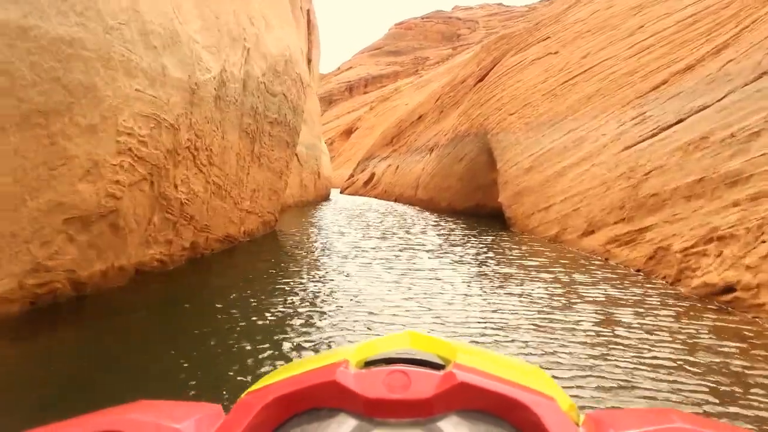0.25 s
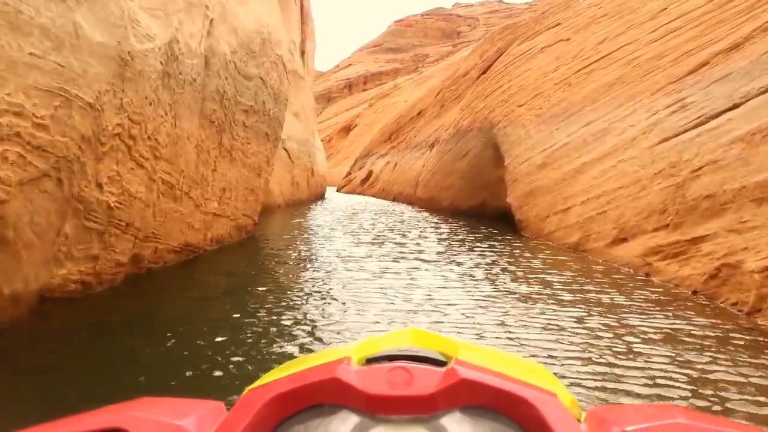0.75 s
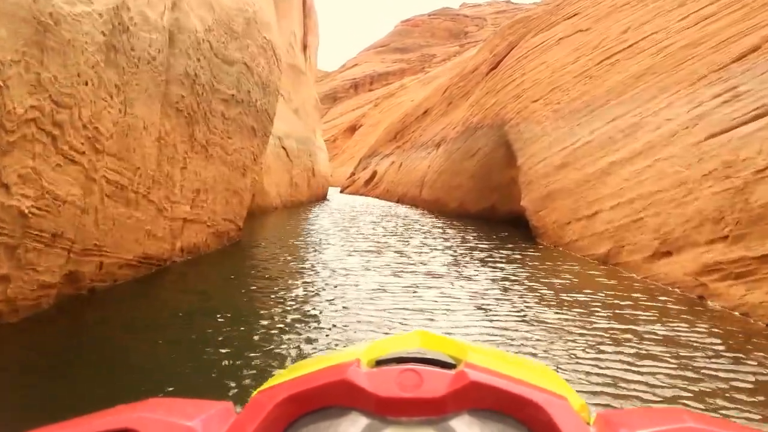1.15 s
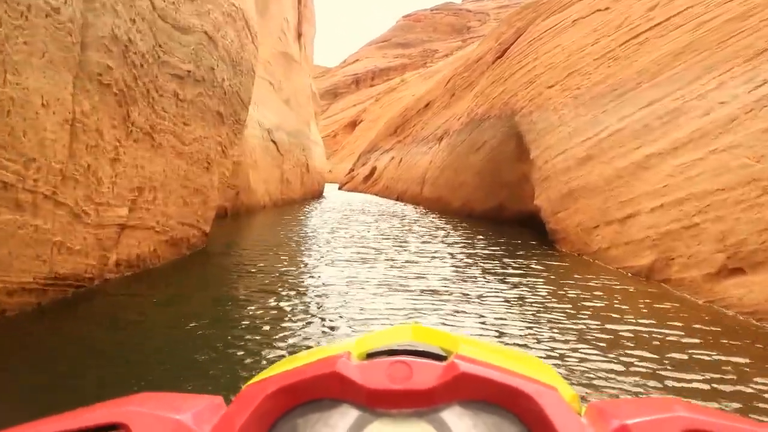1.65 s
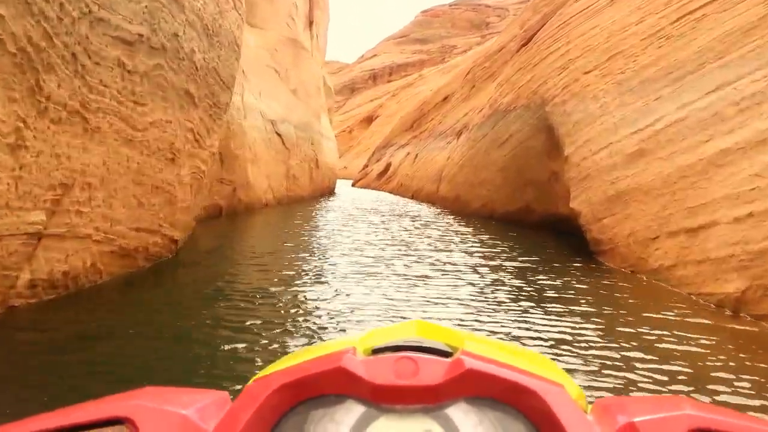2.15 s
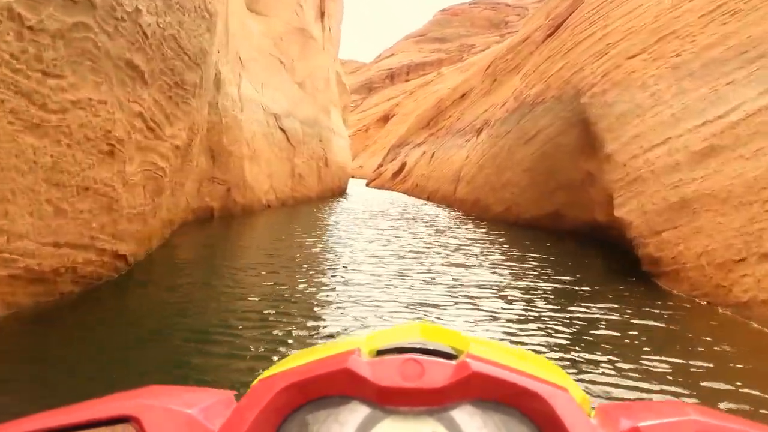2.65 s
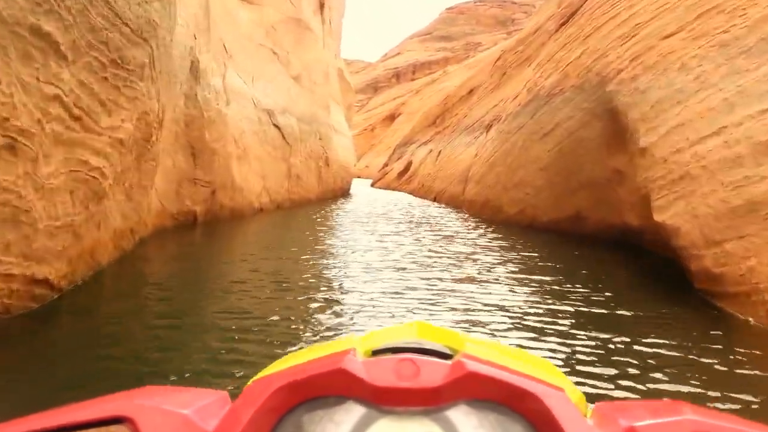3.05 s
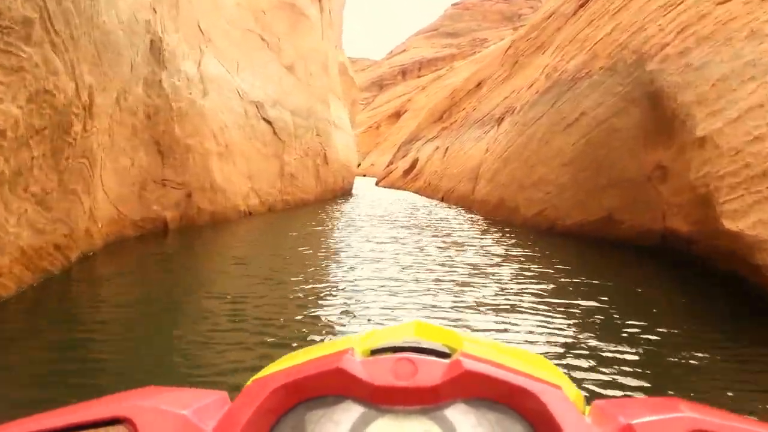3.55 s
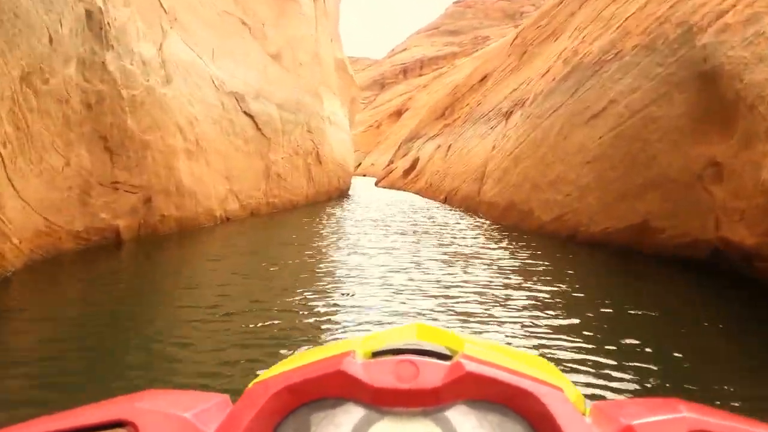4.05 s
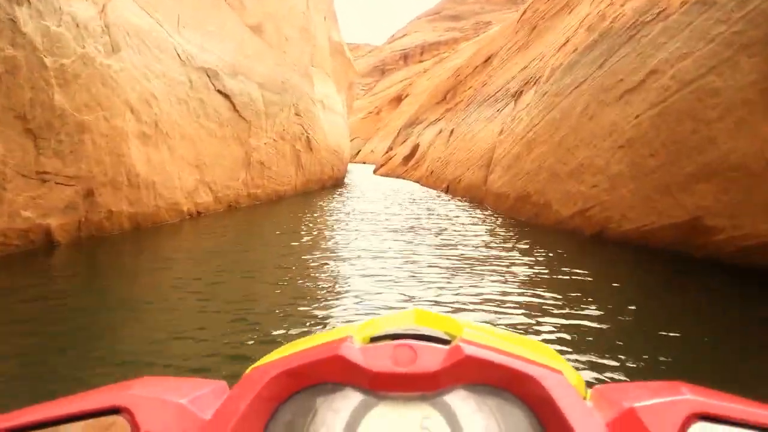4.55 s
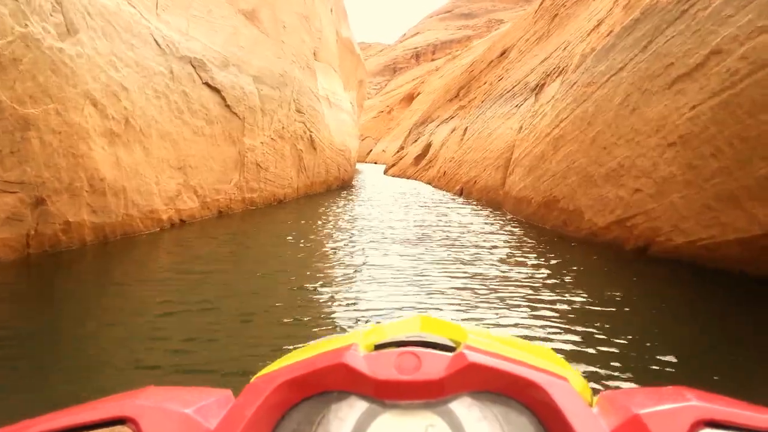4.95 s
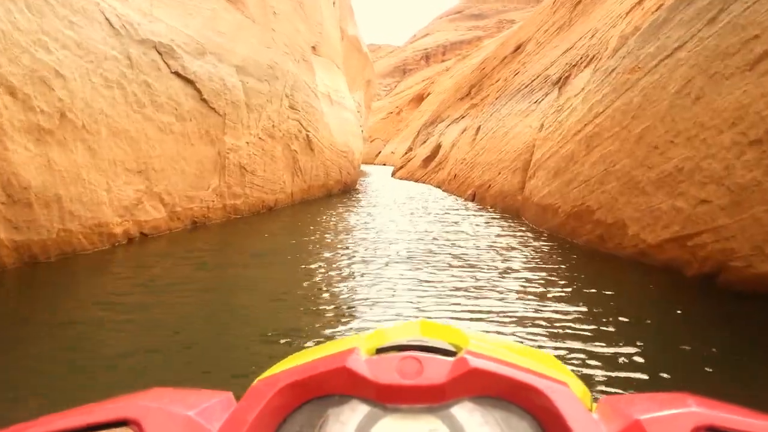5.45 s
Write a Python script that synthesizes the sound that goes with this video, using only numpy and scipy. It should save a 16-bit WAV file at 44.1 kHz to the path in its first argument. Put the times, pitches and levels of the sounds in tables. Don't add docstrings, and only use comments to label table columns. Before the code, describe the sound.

From 0 s, a small watercraft engine is already running at low speed: a thick, buzzing drone centred low, around 230 Hz, with hull boom and rough overtones that waver. A continuous rush of water runs along the hull, swelling and dipping gently, speckled with fine ticking droplets, brighter on the left while the right is muffled. A faint drop taps at 0.3 s; brief stumbles weaken the motor around 1.3 and 1.9 s. At 2.6 s a dull water slap lands on the left. The engine then settles slightly lower, and the hiss on the right thickens a little as rock closes in. Small drops tick at 2.9 and 3.1 s, then a cluster from 3.3 s peaks in one sharp, hard tap at 3.4 s. The motor idles on with dips near 3.8, 4.2 and 4.8 s; light drops fall at 5.1 and 5.6 s, and sound continues to the cut at about 5.7 s.

```python
import sys
import numpy as np
from scipy import signal
from scipy.fft import rfft, irfft, dct, next_fast_len
from scipy.io import wavfile
from scipy.ndimage import uniform_filter1d

SR = 44100
rng = np.random.default_rng(int(sys.argv[2]) if len(sys.argv) > 2 else 0)


def invert_db(level):
    return 10 ** (np.asarray(level, dtype=float) / 20)


def dump(signal):
    limited = np.clip(np.atleast_2d(signal).T, -1, 1)
    pcm = np.round(limited * 32767).astype(np.int16)
    wavfile.write(sys.argv[1], SR, pcm)


N = 250786
SIZE = next_fast_len(N)

# time in seconds, engine cycle rate in Hz, level of its ninth multiple in dB.
ENGINE_SPEED = [(0, 26.25, -11.5), (.22, 26.12, -11), (.4, 26.3, -15.5), (.65, 26.0, -12.5),
                (.85, 26.23, -10.5), (1.15, 26.61, -10.5), (1.45, 26.35, -11), (1.8, 26.4, -12.5),
                (2.25, 26.12, -11), (2.7, 25.45, -12.5), (3.05, 24.84, -12.5), (3.35, 25.12, -14),
                (3.7, 24.97, -11.5), (4.15, 25.35, -11.5), (4.45, 24.35, -10.5), (4.75, 24.35, -11.5),
                (5.1, 24.13, -10.5), (5.69, 24.2, -11.5)]
FIRING_MULTIPLES = (6, 9, 12, 15)
# multiple of the cycle rate, level in dB (firing multiples: relative
# to the ninth's mean; others: relative to -15 dB).
FAST_OVERTONES = [(1, -58), (2, -45), (3, -16.5), (4, -18.5), (5, -20), (6, -10), (7, -31), (8, -14),
                  (9, 0.5), (10, -22), (11, -14.5), (12, -5.5), (13, -20), (14, -16), (15, -16), (16, -31),
                  (17, -20), (18, -18.5), (19, -28), (20, -22.5), (21, -23.5), (22, -23)]
# multiple of the cycle rate, level in dB (firing multiples: relative to
# the ninth's mean; others: relative to -15 dB).
SLOW_OVERTONES = [(1, -60), (2, -40), (3, -29), (4, -27), (5, -15), (6, -21), (7, -39), (8, -10), (9, 0.5),
                  (10, -10), (11, -28), (12, -21.5), (13, -12), (14, -37), (15, -24.5), (16, -34),
                  (17, -27.5), (18, -21), (19, -36), (20, -29), (21, -34.5), (22, -21.5)]
# time in seconds, level change in dB, sag in Hz.
STUMBLES = [(1.29, -5.5, .4), (1.58, -2.5, .4), (1.88, -3.5, 0.048), (2.08, -2, 0.499), (2.93, -3, .2),
            (3.3, -3, 0.047), (3.76, -5, 0.493), (4.21, -2.5, 1.096), (4.8, -6, .5), (5.3, -1.5, 0.31),
            (5.55, -3.5, .3)]
# time in seconds, multiple of the cycle rate, half length in seconds, lift in dB.
WALL_ECHOES = [(0.16, 14, 0.052, 7.5), (0.78, 18, 0.13, 12), (2.2, 5, 0.5, 5), (.6, 4, 0.55, 3.5),
               (1.94, 18, 0.19, 12), (2.3, 18, 0.14, 7), (3.38, 18, 0.29, 8.5), (3.065, 5, 0.51, 6.5),
               (8, 13, 0.13, 5), (5.62, 13, .1, 8), (1.76, 6, 0.36, -15.5), (2.4, 6, 0.82, -5.5),
               (3.84, 6, 0.48, 8.5), (5.55, 6, 0.12, 5.5), (1.75, 12, 0.36, 2), (3.45, 12, 0.22, -6.5),
               (3.3, 12, .1, -9.5), (.05, 15, .12, -12.5), (1.15, 15, .15, -11), (2.65, 15, 0.3, 9),
               (3.3, 15, 0.19, 11), (3.757, 15, .25, 9.5), (0.82, 5, 0.29, -10), (4.9, 14, .1, 10),
               (3.0, 14, .12, 6), (5.2, 12, 0.22, 2), (3.8, 8, .2, 6.5), (4.3, 13, .15, 2),
               (4.75, 8, .4, 4), (4.5, 10, .3, 3)]
# frequency in Hz, phase lag in radians.
PORT_LAG = [(0, .05), (260, .17), (430, .48), (700, .6), (1000, 1.15), (1300, 2.1), (1500, 3.4),
            (2000, 4.95), (2500, 6.4), (4200, 12.1), (16000, 12.5)]
# frequency in Hz, left level in dB per Hz, right level in dB per Hz.
RUSH_SPECTRUM = [(59, -21.5, -21.5), (117, -4, -6.5), (246, 5, 6.5), (417, -1.5, -0.3), (820, -3.5, -5.5),
                 (1030, -6, -10), (1750, -6, -12), (2320, -6, -21.5), (2740, -8.5, -31.5),
                 (4360, -12, -33.5), (6310, -33.5, -35.5), (9020, -32.5, -38.5), (11680, -43, -46),
                 (14300, -65.5, -38.5)]
# frequency in Hz, likeness from 0 to 1.
PORT_LIKENESS = [(40, .98), (290, .99), (430, .92), (600, .77), (800, .72), (1100, .28), (1350, .18),
                 (1750, .3), (2000, .54), (2350, .46), (2800, .17), (4200, .15), (5500, .03)]
# time in seconds, half length in seconds, lift in dB.
SURGES = [(.4, 0.39, 0.6), (.9, .12, -1), (1.24, .04, 2.5), (1.68, 0.047, 2.5), (1.87, 0.044, 2),
          (2.2, 0.025, 1), (2.41, .1, -2.5), (2.6, 0.044, 2), (3.0, 0.13, 1), (3.33, 0.073, 2),
          (4.3, .2, 0.8), (4.75, 0.085, -0.5), (5.6, 0.14, 1.5)]
# time in seconds, peak level in dB, ring frequency in Hz.
DROPS = [(0.2992, -20, 3967), (2.85, -18, 3760), (3.0914, -14, 3297), (3.3094, -24, 3570),
         (3.3204, -22, 4150), (3.3804, -21, 2930), (3.4362, -4.5, 3760), (3.4413, -17, 3600),
         (3.6864, -21, 3300), (5.1014, -18, 3320), (5.1178, -16.5, 3792), (5.6337, -18, 3780)]
# time in seconds, peak level in dB, ring frequency in Hz.
DULL_SLAP = [
    (2.6023, -9, 1750),
]
# frequency in Hz, size of one step in dB.
CAMERA_STEP = [(4800, -60), (5800, -34), (9000, -34), (10200, -33.5), (11500, -33.5), (12500, -34.5),
               (13200, -36), (14500, -37)]


def walk(rate):
    hold = int(SR / rate)
    held = np.repeat(rng.standard_normal(N // hold + 1), hold)
    return 1.28 * uniform_filter1d(uniform_filter1d(held, hold), hold)[:N]


def curves(table):
    s, *columns = np.transpose(table)
    return [np.interp(np.arange(N) / SR, s, column) for column in columns]


def bumps(rows, size=64):
    t = np.arange(N // size + 1) * size / SR
    lift_db = 0 * t
    for s, half, db in rows:
        lift_db = lift_db + db * np.exp(-((t - s) / half) ** 2)
    return np.repeat(lift_db, size)[:N]


def ring(hz, t60, size):
    t = np.arange(size) / SR
    return np.sin(2 * np.pi * hz * t) * np.exp(-np.log(1000) * t / t60)


def ports(spectrum, other, likeness, gains):
    lag = np.interp(np.fft.rfftfreq(SIZE, 1 / SR), *np.transpose(PORT_LAG))
    delayed = likeness * spectrum * np.exp(-1j * lag)
    right = delayed + np.sqrt(1 - likeness ** 2) * other
    return np.array([spectrum, right]) * gains


def engine(scatter_db=1.5, slip=.015, turn=.3, spread=.16):
    stumble_s, recover_s = .03, .12
    boom_share = 0.21
    t = np.arange(N) / SR
    hz, ninth_db = curves(ENGINE_SPEED)
    ninth_db = ninth_db + bumps([(s, stumble_s, db) for s, db, _ in STUMBLES])
    sag_hz = sum(sag * (t > s) * np.exp(-np.abs(t - s) / recover_s) for s, _, sag in STUMBLES)
    hz = hz - uniform_filter1d(sag_hz, int(stumble_s * SR))
    cycle = 2 * np.pi * np.cumsum(hz) / SR
    slow = np.clip((26.0 - hz) / 1.6, 0, 1)
    timing = slip * walk(24)
    mean_db = ninth_db.mean()
    drone = 0
    for (k, fast_db), (_, slow_db) in zip(FAST_OVERTONES, SLOW_OVERTONES):
        overtone_db = fast_db + slow * (slow_db - fast_db)
        if k in FIRING_MULTIPLES:
            share = 1 if k == 9 else boom_share
            db = mean_db + share * (ninth_db - mean_db) + overtone_db + 0.87 * walk(21.91)
        else:
            db = -15 + overtone_db + scatter_db * min((k / 9) ** 2, 1.6) * walk(5)
        db = db + bumps([(s, half, lift_db) for s, m, half, lift_db in WALL_ECHOES if round(m) == k])
        phase = k * (cycle + timing) - turn * k - spread * k ** 2 + 0.22 * walk(4.99)
        drone = drone + np.sqrt(2) * invert_db(db) * np.cos(phase)
    return drone, cycle


def rush(cycle):
    rush_db = -16.5
    hiss_share = 0.83
    hiss_octave, wall_top_octave = np.log2(5500), np.log2(10500)
    wall_s, wall_nears_s, wall_db = 2.7, .4, 1
    hz = np.fft.rfftfreq(SIZE, 1 / SR) + 1e-9
    knots, *levels = np.transpose(RUSH_SPECTRUM)
    port_db = [np.interp(np.log(hz), np.log(knots), level) for level in levels]
    likeness = np.interp(hz, *np.transpose(PORT_LIKENESS))
    field = ports(*rfft(rng.standard_normal((2, SIZE))), likeness, invert_db(port_db))
    octave = np.clip(np.log2(hz), 7.5, 14)
    surge_db = bumps(SURGES)
    returned_db = wall_db * np.tanh((np.arange(N) / SR - wall_s) / wall_nears_s)
    shared = walk(9)
    out = 0
    for centre in np.arange(7.5, 14.1, .5):
        band = np.cos(np.pi * np.clip(octave - centre, -.5, .5)) ** 2
        wet = np.clip((centre - 8.0) / 2, 0, 1)
        flow_db = surge_db * (hiss_share if centre > hiss_octave else 1)
        db = wet * (flow_db + .5 * shared + 0.18 * np.cos(cycle)) + 0.55 * walk(8)
        db = db * np.array([[1], [.4 if 2 ** centre > 3000 else 1]])
        db[1] += returned_db * (hiss_octave < centre < wall_top_octave)
        out = out + invert_db(db) * irfft(field * band, SIZE)[:, :N]
    return out * invert_db(rush_db) / np.std(out)


def spray(rate=250, spread_db=3.5, spray_db=-52):
    sizes = invert_db(spread_db * rng.exponential(size=(2, N)))
    hits = (rng.random((2, N)) < rate / SR) * sizes
    tick = np.hanning(40) * (ring(8500, .004, size=40) + 2.3 * ring(3800, .004, size=40))
    return signal.fftconvolve(hits, tick[None])[:, :N] * invert_db(spray_db + np.array([[0], [-12.]]))


def drops():
    size = 600
    out = np.zeros((2, N))
    t = np.arange(size) / SR - .0014
    swell = np.exp(-(t / np.where(t < 0, .0007, .0004)) ** 2)
    swell = swell + 0.21 * (t > 0) * np.exp(-np.abs(t) / 0.0024)
    edge = np.exp(-((t - .0002) / 0.00022) ** 2)
    bright = invert_db(-16) * ring(7300, .1, size) + invert_db(-25) * ring(10800, .1, size)
    bright = bright + invert_db(-37) * ring(14000, .1, size)
    for s, db, hz in DROPS + DULL_SLAP:
        sagging_t = t - 55 * (t + 0.0005) ** 2
        hit = swell ** (3600 / hz) * np.sin(2 * np.pi * hz * sagging_t)
        hit = hit + (hz / 3800) ** 2 * edge * bright
        i = int(s * SR)
        out[:, i:i + size] += invert_db(db + 6.5 + np.array([[0], [-22.]])) * hit
    return out


def scene():
    drone, cycle = engine()
    drone = irfft(ports(rfft(drone, SIZE), 0, 0.98, 0.91), SIZE)[:, :N]
    return drone + rush(cycle) + spray() + drops()


def camera_rounding(x, hop=1024, offset=551):
    top_hz = 14580
    window = signal.windows.kaiser_bessel_derived(2 * hop, 4 * np.pi)
    starts = np.arange(0, N + 2 * hop, hop)
    padded = np.pad(x, ((0, 0), (2 * hop - offset, 4 * hop)))
    frames = padded[:, starts[:, None] + np.arange(2 * hop)] * window
    a, b, c, d = np.split(frames, 4, axis=2)
    folded = np.concatenate([-c[..., ::-1] - d, a - b[..., ::-1]], axis=2)
    lines = dct(folded, type=4, norm="ortho")
    hz = (np.arange(hop) + .5) * SR / (2 * hop)
    wander_db = 2.0 * np.repeat(rng.standard_normal((2, len(starts), hop // 32)), 32, axis=2)
    port_db = np.array([1.5, -1.5])[:, None, None]
    step = invert_db(np.interp(hz, *np.transpose(CAMERA_STEP)) + wander_db + port_db)
    rounded = np.sign(lines) * step * np.floor(np.abs(lines) / step + .4)
    lines = np.where(hz < CAMERA_STEP[0][0], lines, rounded) * (hz < top_hz)
    u, v = np.split(dct(lines, type=4, norm="ortho"), 2, axis=2)
    frames = np.concatenate([v, -v[..., ::-1], -u[..., ::-1], -u], axis=2) * window
    out = frames[:, 1:, :hop] + frames[:, :-1, hop:]
    return out.reshape(2, -1)[:, hop - offset:][:, :N]


def low_pass(x):
    return signal.sosfilt(signal.butter(12, 15850, fs=SR, output="sos"), x)


def record(dry):
    bass_cut = signal.butter(4, 55, "highpass", fs=SR, output="sos")
    x = signal.sosfilt(bass_cut, dry)
    x = camera_rounding(np.tanh(0.72 * x) / 0.67)
    return low_pass(x)


dry = scene()
out = record(dry)
dump(out)
```